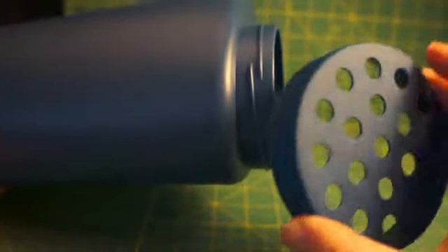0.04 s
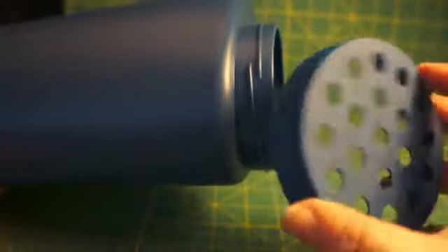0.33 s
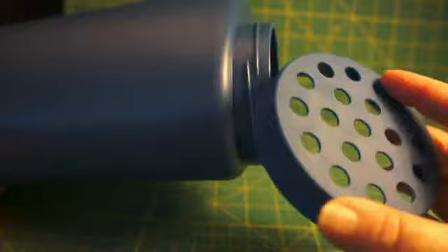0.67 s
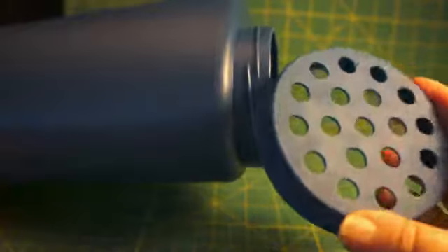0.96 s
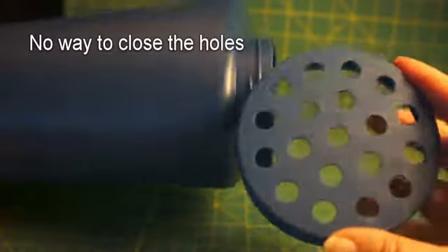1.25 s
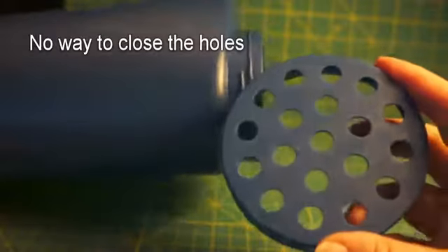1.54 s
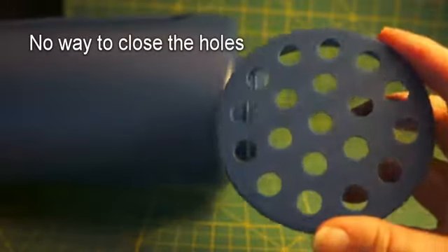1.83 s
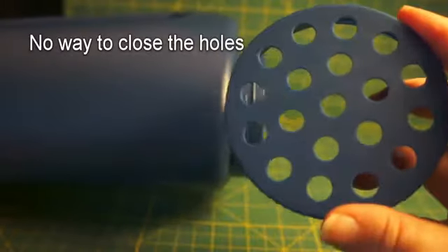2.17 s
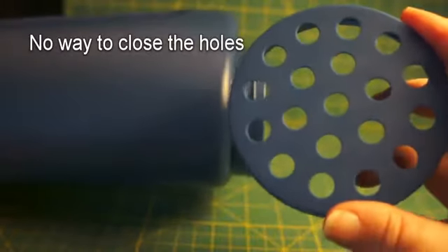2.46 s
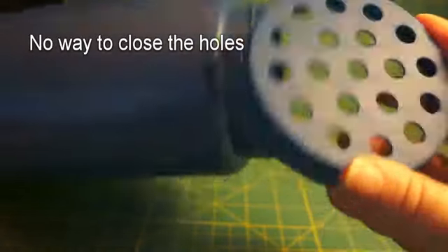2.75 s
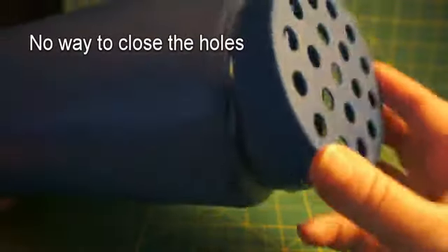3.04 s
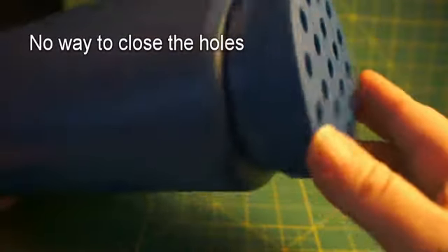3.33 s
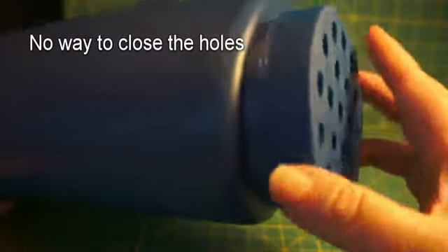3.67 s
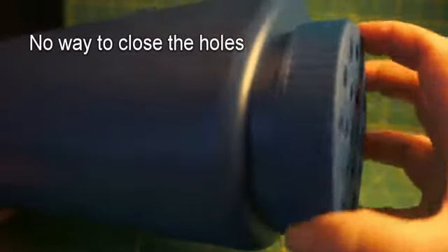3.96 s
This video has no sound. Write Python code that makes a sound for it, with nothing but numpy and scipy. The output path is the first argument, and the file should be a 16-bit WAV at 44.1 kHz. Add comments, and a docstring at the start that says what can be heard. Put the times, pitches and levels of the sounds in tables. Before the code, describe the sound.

A plastic cap bumps a hollow plastic bottle and is rubbed softly in the fingers. After a pause, it knocks, scrapes and snaps onto the bottle's neck, heard up close in a small room with a faint hum.

```python
"""A plastic shaker cap is turned in the fingers, bumps a plastic bottle lying on a table, and is
scraped and pressed onto its neck. Each contact clicks the rim, thuds the bottle and knocks the cap.
Sliding is a stream of tiny slips with a few squeaks, and the thread snaps past.
The touches ring in the hollow bottle and a small room with a faint steady hum."""
import sys
import numpy as np
from scipy import signal
from scipy.fft import rfft, irfft
from scipy.io import wavfile

SR = 44100
rng = np.random.default_rng(int(sys.argv[2]) if len(sys.argv) > 2 else 0)


def file_out(sig):
    """Save sig as 16-bit WAV at sys.argv[1]."""
    # one column per channel
    cols = np.atleast_2d(sig).T
    # limit, then scale
    lim = np.clip(cols, -1, 1)
    pcm = np.round(lim * 32767).astype(np.int16)
    wavfile.write(sys.argv[1], SR, pcm)


N = 176400
T = np.arange(N) / SR
TOP_HZ = 8750


# Cap against bottle. Each row: start in seconds, thud pitch in Hz, thud level in dB, cap pitch in Hz,
# cap level in dB, cap time constant in seconds, rim clack level in dB before halving, click level in dB.
KNOCK_HITS = [ (.3357, 168, -13.5, 730, -16.5, 0.004, -23, -35.5),
              (0.3377, 368, -17, 610, -7.5, 0.0005, -26, -61),
              (0.3447, 190, -25, 365, -18.5, 0.0066, -21, -63),
              (0.359, 192, -17.5, 500, -23, 0.0035, -37, -50),
              (.4465, 241, -25, 730, -29.5, 0.002, -33, -36), (.4550, 185, -21, 374, -27, 0.0049, -32, -49),
              (2.6484, 248.4, -14.5, 1020, -23, 0.0025, -29.5, -15),
              (2.6625, 268, -28.5, 756, -21, 0.0086, -18, -27),
              (2.6775, 296, -19.5, 989, -35, 0.0065, -31, -32),
              (2.8339, 414, -18, 1610, -18, 0.0021, -16.5, -27),
              (2.8410, 163, -16.5, 1550, -23, 0.0025, -16, -34),
              (2.8853, 357, -20.5, 724, -9.5, 0.0042, -7.5, -26.5),
              (2.9090, 167, -18, 750, -25, 0.0023, -11.5, -39),
              (3.1877, 194, -21, 1225, -40, 0.0035, -19, -29),
              (3.2003, 195, -18.5, 657, -20, 0.0019, -20.5, -41),
              (3.2180, 180, -15.5, 654, -30.5, 0.00088, -23, -36.5),
              (3.2215, 142, -22, 960, -21, 0.0021, -17, -39),
              (3.2435, 206, -15.5, 666, -15, 0.0035, -19.5, -28),
              (3.2790, 248, -12.5, 617, -26, 0.0047, -30, -40),
              (3.2825, 375, -22.5, 673, -14, 0.0042, -21, -38),
              (3.2925, 182, -15.5, 625, -16.5, 0.0061, -8.5, -17.5),
              (3.3150, 146, -20, 573, -24.5, .003, -29, -31.5),
              (3.5912, 206, -36, 693, -24, 0.0038, -18, -34.5),
              (3.6345, 154, -26, 663, -32.5, 0.0043, -22.5, -36),
              (3.6935, 170, -44, 637, -24, 0.0024, -26.5, -41),
              (3.807, 281, -19.5, 603, -20, 0.0023, -25, -27.5),
              (3.9875, 304, -15.5, 650, -34, 0.0014, -26, -33.5)]
# Tone of the rim's clack and of its click. Each row: frequency in Hz, relative gain in dB.
RIM_EQ = [(200, -17), (600, -3), (1000, 2.5), (1600, -3), (1900, -20.5), (2400, -8), (3200, -19),
          (8000, -40)]
CLICK_EQ = [(500, 10), (2000, 3), (3100, -2.5), (4200, 3), (5400, 0.5), (6600, 2.5), (7600, -5.5),
            (8700, -10.5)]
THUD_S, RIM_S, CLICK_S = 0.0036, 0.0013, 0.0045  # time constants
BODY_LAG_S = 0.002164  # the bodies answer a moment after the rim touches

def knocks():
    """The rim clacks and clicks; then the bottle thuds and the cap knocks, pitched by place and grip."""
    out = np.zeros(N)
    rim, click = (unit(colour(rng.standard_normal(N), eq)) for eq in (RIM_EQ, CLICK_EQ))
    for start, thud_hz, thud_db, cap_hz, cap_db, cap_s, rim_db, click_db in KNOCK_HITS:
        span = slice(int(start * SR), int(start * SR) + SR // 10)
        age = T[:len(T[span])]
        body_age = np.maximum(age - BODY_LAG_S, 0)
        out[span] += amp(rim_db) * bloom(age, RIM_S) * rim[span] / 2
        out[span] += amp(click_db) * np.exp(-age / CLICK_S) * click[span]
        out[span] += amp(thud_db) * bloom(body_age, THUD_S) * np.sin(2 * np.pi * thud_hz * body_age)
        out[span] += amp(cap_db) * bloom(body_age, cap_s) * np.sin(2 * np.pi * cap_hz * body_age)
    return out


# Fingers and rim sliding. Each row: middle and length in seconds, then rumble, rasp and hiss in dB.
SLIDES = [ (0.08, 0.24, -53.5, -67, -55), (0.258, 0.051, -56, -51, -54), (0.415, 0.14, -53, -41.5, -57.5),
          (0.558, 0.11, -42.5, -51.5, -53.5), (0.642, 0.06, -50, -55, -50),
          (0.835, 0.11, -51, -51.5, -54.5), (0.986, 0.19, -50, -58, -57.5), (2.689, 0.11, -29, -33, -40.5),
          (2.772, 0.098, -28.5, -28.5, -38.5), (2.834, 0.07, -30.5, -29, -33),
          (2.909, 0.12, -25, -30.5, -41), (3.006, 0.17, -37.5, -33.5, -45), (3.159, 0.038, -38, -30.5, -32),
          (3.209, 0.068, -24.5, -25, -32.5), (3.25, 0.02, -19, -22, -32), (3.31, 0.086, -28, -24, -41),
          (3.43, 0.15, -49.5, -43, -62), (3.581, 0.1, -33.5, -37.5, -55.5), (3.689, 0.16, -34, -40, -56),
          (3.794, 0.073, -51, -42, -47.5), (3.899, 0.16, -46.5, -44.5, -56.5),
          (3.982, .11, -31.5, -31.5, -45)]
# Soft hollow rubs as the cap is turned. Each row: middle and length in seconds, level in dB.
FINGER_RUBS = [(1.134, 0.27, -36), (1.135, 0.087, -36.5), (1.291, 0.091, -34.5), (1.333, 0.073, -31.5)]
# Tone of the four friction layers. Each row: frequency in Hz, relative gain in dB.
RUMBLE_EQ = [(30, -39.5), (95, -40), (135, -0.5), (200, 0.5), (300, -1.5), (440, -7), (700, -17.5),
             (2000, -79)]
RASP_EQ = [(200, -34), (520, -12.5), (630, 10.5), (740, 6), (820, -1), (1000, 2), (1650, -8), (1880, -13),
           (2150, -13.5), (2700, -23), (3600, -31.5), (9000, -69.5)]
HISS_EQ = [(600, -37), (1900, -5.5), (2700, 4.5), (3600, -2), (4100, 2.5), (5400, 0), (6700, 4),
           (7600, -3.5), (8700, -8)]
HOLLOW_EQ = [(130, -15), (200, -10), (262, 9.5), (330, -4), (440, -11), (600, -7.5), (755, 4), (830, -2),
             (910, -12), (1000, -2.5), (1120, -6), (1500, -25.5), (2400, -24), (4000, -28.5), (6500, -31.5),
             (8700, -43.5)]
SLIPS_PER_S, SLIP_SPREAD_DB, JUDDER_DB, JUDDER_PER_S = 6100, 1, 2.5, 90
RUB_GRAIN_DB, RUB_GRAINS_PER_S = 1.5, 130  # the skin grips and lets go

def scraping():
    """Tiny uneven slips, in juddering bunches, rumble the bottle, rasp the cap and hiss at the contact."""
    slips = (rng.random(N) < SLIPS_PER_S / SR) * rng.standard_normal(N)
    slips *= amp(SLIP_SPREAD_DB * rng.standard_normal(N))
    slips *= amp(JUDDER_DB * wander(JUDDER_PER_S))
    rumble, rasp, hiss = (unit(colour(slips, eq)) for eq in (RUMBLE_EQ, RASP_EQ, HISS_EQ))
    hollow = unit(colour(slips, HOLLOW_EQ))
    grain = amp(RUB_GRAIN_DB * wander(RUB_GRAINS_PER_S))
    out = hollow * grain * sum(amp(db) * swell(middle, length) for middle, length, db in FINGER_RUBS)
    for middle, length, rumble_db, rasp_db, hiss_db in SLIDES:
        friction = amp(rumble_db) * rumble + amp(rasp_db) * rasp + amp(hiss_db) * hiss
        out += swell(middle, length) * friction
    return out


# Rim squeaks. Each row: middle and length in seconds, start and end pitch in Hz, level in dB.
SQUEAK_GLIDES = [(0.373, 0.0098, 500, 980, -26.5), (0.453, .016, 1250, 454, -32.5),
                 (2.757, 0.052, 4360, 4670, -38), (2.823, 0.063, 4160, 4640, -35.5),
                 (3.158, 0.02, 3070, 3410, -30)]
WAVER_DEPTH, WAVER_PER_S = 0.049, 990

def squeaks():
    """Short wavering glides where the rim sticks and slips on the neck."""
    out = np.zeros(N)
    waver = 1 + WAVER_DEPTH * wander(WAVER_PER_S)
    for middle, length, start_hz, end_hz, db in SQUEAK_GLIDES:
        hz = np.interp(T, [middle - length / 2, middle + length / 2], [start_hz, end_hz]) * waver
        tone = unit(np.sin(2 * np.pi * np.cumsum(hz) / SR))
        out += amp(db) * swell(middle, length) * tone
    return out


# Snaps of the thread. Each row: start in seconds, level in dB.
SNAPS = [(3.2010, -20), (3.2177, -17), (3.2220, -17), (3.2262, -24.5), (3.2426, -13.5), (3.2462, -25),
         (3.281, -23), (3.2919, -15.5)]
# Their bright tone. Each row: frequency in Hz, relative gain in dB.
SNAP_EQ = [(800, 2), (2000, -9), (3200, 3), (4700, 9), (5800, 8.5), (7300, 4), (8700, -9)]
SNAP_S = 0.0016  # time constant

def thread_snaps():
    """Short, crisp snaps as the cap rides over the ridges of the thread."""
    out = np.zeros(N)
    snap = unit(colour(rng.standard_normal(N), SNAP_EQ))
    for start, db in SNAPS:
        age = np.maximum(T - start, 0)
        out += amp(db) * (T >= start) * np.exp(-age / SNAP_S) * snap
    return out


# Blows that ring the loosely held cap, and the cap landing on the open neck.
# Each row: start in seconds, level in dB, brightness in dB per octave above the lowest mode.
CAP_HITS = [(.3381, -19.5, 1), (.449, -31, 2), (2.8877, -37.5, 10.5)]
NECK_HITS = [(2.6508, -19.5, 4)]
# Modes of cap and neck. Each row: pitch in Hz, relative level in dB, seconds to fall 60 dB.
CAP_RING = [(174.4, -7.5, 0.15), (410, -7, 0.049), (479, -6, 0.14), (610, -8, .12), (741.5, -6, 0.19),
            (992, -11.5, 0.079), (1290, -12.5, .08), (1355, -22, 0.071), (1755, -16.5, 0.11),
            (2135, -20.5, 0.059)]
NECK_RING = [(252.5, 1, 0.69), (283, -17.5, 0.6), (313.7, -2.5, 0.43), (648, -4.5, 0.24), (755, -9.5, 0.22),
             (920, -26, 0.14)]

def free_ring(blows, modes):
    """A body rings out after a blow; harder contact favours its higher modes."""
    out = np.zeros(N)
    lowest_hz = modes[0][0]
    for start, blow_db, brightness in blows:
        onset = int(start * SR)
        age = T[:N - onset]
        for hz, db, t60 in modes:
            level_db = blow_db + db + brightness * np.log2(hz / lowest_hz)
            out[onset:] += amp(level_db - 60 * age / t60) * np.sin(2 * np.pi * hz * age)
    return out


# The bottle bumps the table. Each row: start in seconds, level in dB.
TABLE_HITS = [(0.337, -32.5), (2.652, -39), (3.243, -41)]
TABLE_S = 0.0073  # time constant, which also sets the pitch

def table_bumps():
    """Deep, dull bumps of the table under firm contacts."""
    out = np.zeros(N)
    for start, db in TABLE_HITS:
        age = np.maximum(T - start, 0)
        out += amp(db) * bloom(age, TABLE_S) * np.cos(age / TABLE_S)
    return out


# Resonances of bottle and room, their weighting by register, and the tone of the reverb.
# Each row: frequency in Hz, relative gain in dB.
RESONANCES = [(139, 7), (157, 2), (183, 3), (210, 1), (252, 7), (318, 6), (377, 2), (441, 4), (610, 2),
              (746, 3), (876, 2), (994, 6), (1062, 5), (1318, 3), (1357, 1), (1438, 8), (1475, 4),
              (1614, 7), (1695, 5), (1754, 5)]
RESONANCE_EQ = [(140, -1), (190, -1.5), (260, 1.5), (400, -2), (700, -4), (1000, 6), (1450, 0.7),
                (1750, -2)]
REVERB_EQ = [(100, -2), (350, 6), (700, -2.5), (2000, 4), (4000, -2.5), (9000, 1)]
RING_DB, RING_T60_S = -3, 0.42
REVERB_GAIN, REVERB_T60_S, PREDELAY_S = 0.298, 0.24, 0.0061

def bottle_and_room(touches):
    """The hollow bottle and the small room ring on after every touch."""
    tail = rng.standard_normal(N) * amp(-60 * T / REVERB_T60_S) * (T > PREDELAY_S)
    reverb = colour(through(touches, tail / np.linalg.norm(tail)), REVERB_EQ)
    ring = np.zeros(N)
    for hz, db in RESONANCES:
        register_db = np.interp(hz, *np.array(RESONANCE_EQ).T)
        ring += amp(db + register_db) * resonate(touches, hz, RING_T60_S)
    return touches + REVERB_GAIN * reverb + amp(RING_DB) * ring


# The room's boomy hum. Each row: pitch in Hz, level in dB, ring time in seconds split over two stages.
HUM_BANDS = [(182.9, -41.5, 0.26), (221.4, -55.5, 0.42), (256.3, -43.5, 0.48), (291.4, -49, 0.34)]
# Tone of the air. Each row: frequency in Hz, relative gain in dB.
AIR_EQ = [(25, -22), (70, -16.5), (110, -8), (170, 5), (290, 1.5), (370, -8.5), (520, -4), (680, -1),
          (850, -4), (1200, -7), (1800, -15.5), (2800, -17.5), (4500, -26), (6000, -29), (6550, -24.5),
          (7200, -33), (8700, -36.5)]
AIR_DB = -42

def room_tone():
    """Soft steady air noise with a wavering low hum."""
    hum = np.zeros(N)
    for hz, db, ring_s in HUM_BANDS:
        band = resonate(rng.standard_normal(N), hz, ring_s / 2)
        hum += amp(db) * unit(resonate(band, hz, ring_s / 2))
    return hum + amp(AIR_DB) * unit(colour(rng.standard_normal(N), AIR_EQ))


def amp(db):
    """Decibels to gain."""
    return 10 ** (np.asarray(db) / 20)


def unit(x):
    """Scale to rms 1."""
    return x / np.sqrt(np.mean(x ** 2))


def through(x, response):
    """Pass a sound through an impulse response."""
    return signal.fftconvolve(x, response)[:len(x)]


def colour(x, points, size=4096):
    """Causal EQ from (Hz, dB) points, rolled off above TOP_HZ; white noise keeps its level."""
    hz, db = np.array(points, float).T
    freqs = np.maximum(np.fft.rfftfreq(size, 1 / SR), 1)
    gain = amp(np.interp(np.log(freqs), np.log(hz), db)) / (1 + (freqs / TOP_HZ) ** 20)
    cepstrum = irfft(np.log(gain))
    cepstrum[1:size // 2] *= 2  # folding to minimum phase keeps attacks sharp
    cepstrum[size // 2 + 1:] = 0
    response = irfft(np.exp(rfft(cepstrum)))
    return through(x, response / np.linalg.norm(response))


def resonate(x, hz, t60):
    """One mode, gain 1 at its centre."""
    radius = np.exp(-np.log(1000) / (t60 * SR))
    pole = radius * np.exp(2j * np.pi * hz / SR)
    return 2 * (1 - radius) * signal.lfilter([1], [1, -pole], x).real


def swell(middle, length):
    """A smooth rise and fall."""
    return np.cos(np.pi * np.clip((T - middle) / length, -.5, .5))


def bloom(age, tau):
    """Rises to 1 after tau seconds and dies away."""
    return age / tau * np.exp(1 - age / tau)


def wander(per_s):
    """Random wavering, spread near 1."""
    return np.interp(T * per_s, np.arange(N), rng.standard_normal(N))


LOW_CUT_HZ = 101  # a low cut keeps deep boom out of the knocks, scrapes and rings

def scene():
    """Cap and bottle up close in a quiet room, in mono."""
    touches = knocks() + scraping() + squeaks() + thread_snaps()
    rings = free_ring(CAP_HITS, CAP_RING) + free_ring(NECK_HITS, NECK_RING)
    low_cut = signal.butter(4, LOW_CUT_HZ, "high", fs=SR, output="sos")
    plastic = signal.sosfilt(low_cut, bottle_and_room(touches) + rings)
    return (plastic + table_bumps() + room_tone())[None]


def record(dry):
    """A steep low-pass cuts the top off the mix."""
    return signal.sosfilt(signal.ellip(10, .2, 70, TOP_HZ, fs=SR, output="sos"), dry)


dry = scene()
out = record(dry)
file_out(out)
```